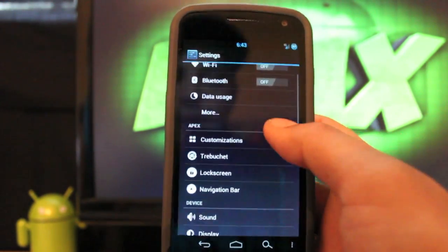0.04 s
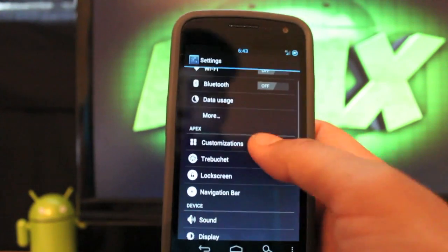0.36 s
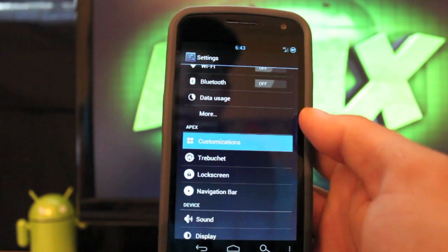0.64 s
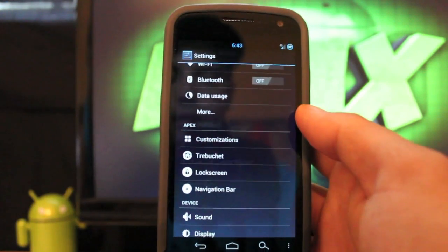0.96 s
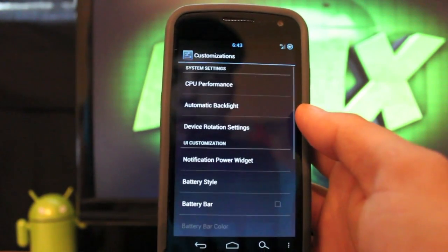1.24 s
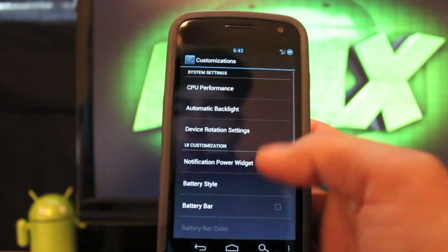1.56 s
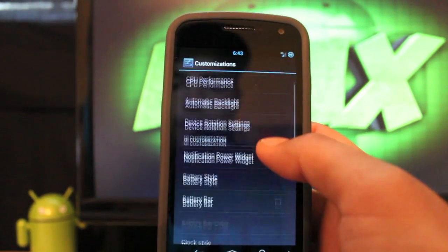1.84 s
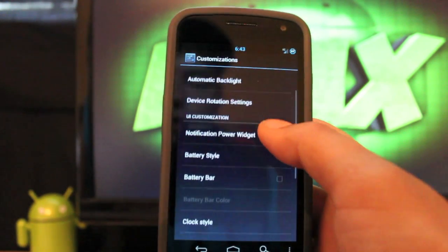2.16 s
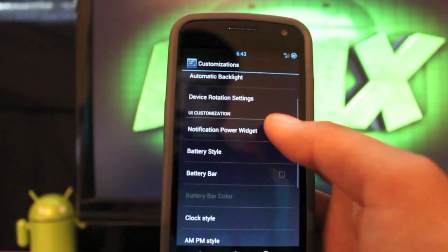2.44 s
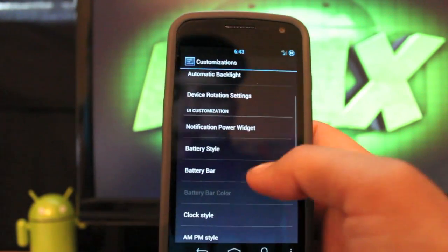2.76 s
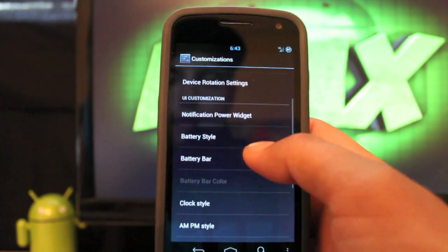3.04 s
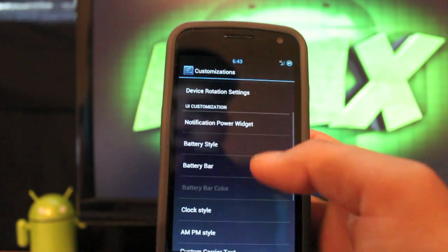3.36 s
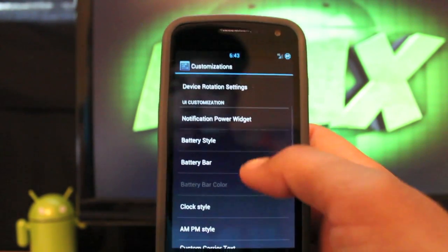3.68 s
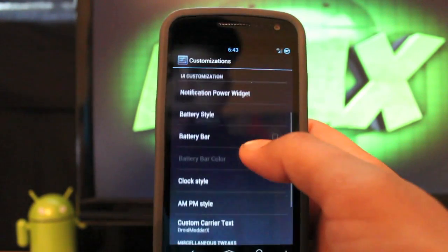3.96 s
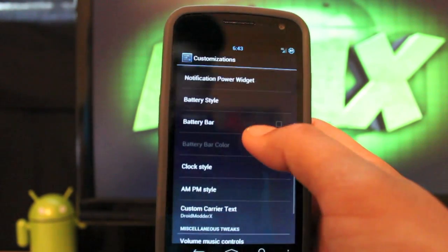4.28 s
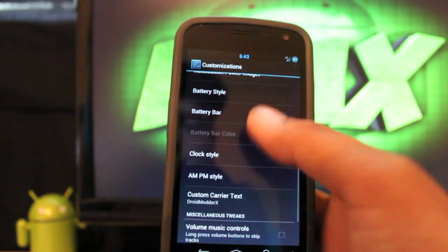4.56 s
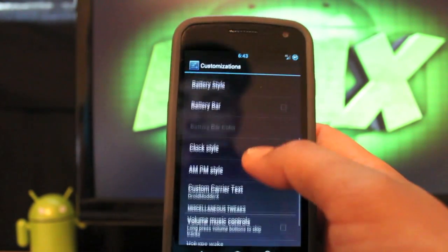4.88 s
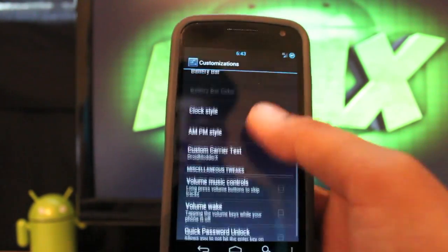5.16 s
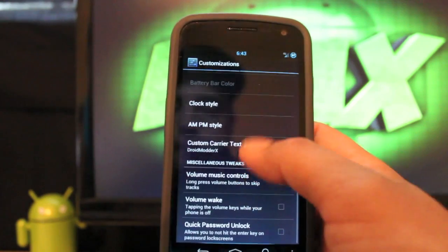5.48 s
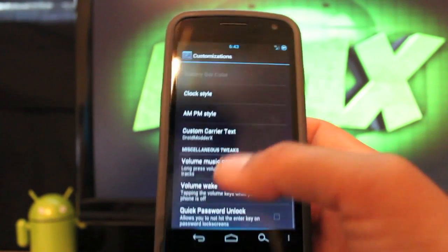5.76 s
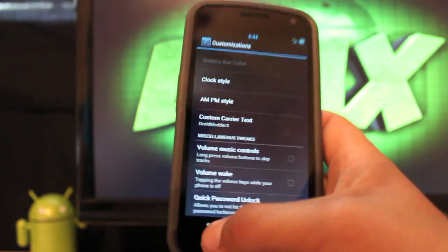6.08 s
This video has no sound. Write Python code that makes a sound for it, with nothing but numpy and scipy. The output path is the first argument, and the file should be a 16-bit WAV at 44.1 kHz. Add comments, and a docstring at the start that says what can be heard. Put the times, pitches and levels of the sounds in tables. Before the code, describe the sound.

A faint fan hum and hollow hiss, then dull thumps, low rumble and a few plastic ticks as a phone is handled close up.

```python
"""A quiet room: a faint fan hum and a hollow microphone hiss run throughout.
At about 1.3 s a phone, held and thumbed close to the camera, gives a first faint, deep bump.
From 4.3 s the handling sends runs of dull, soft-edged thumps and rumble into the microphone,
and near 4.8 s the plastic case ticks a few times. The recorder's limiter ducks after the hardest
thump, at 5.65 s, and one last thin tick comes just before the end."""
import sys
import numpy as np
from scipy import signal
from scipy.fft import rfft, irfft
from scipy.io import wavfile
from scipy.ndimage import uniform_filter1d, minimum_filter1d

SR = 44100
rng = np.random.default_rng(int(sys.argv[2]) if len(sys.argv) > 2 else 0)


def file_out(sig):
    """Save sig as 16-bit WAV at sys.argv[1]."""
    # one column per channel
    cols = np.atleast_2d(sig).T
    # limit, then scale
    lim = np.clip(cols, -1, 1)
    pcm = np.round(lim * 32767).astype(np.int16)
    wavfile.write(sys.argv[1], SR, pcm)


N = 269892
TIME = np.arange(N) / SR
FREQS = np.fft.rfftfreq(N, 1 / SR)

# Steady tones of the fan and electronics. Each row: pitch in Hz, rms level in dB.
FAN_TONES = [(236.0, -62.5), (323, -70), (629.7, -68.5), (1980, -72)]
# Resonances excited by the fan's air noise. Each row: centre in Hz, rms level in dB, width in Hz.
FAN_WHIRR = [(233, -72, 24), (455.6, -67, 21), (484.7, -66.5, 10.6), (520.7, -68.5, 8), (594, -65, 70),
             (679, -68, 16)]
# Air noise of the room. Each row: frequency in Hz, density in dB per Hz.
ROOM_AIR = [(5, -100), (16, -82), (35, -90), (65, -84.5), (400, -86.5), (750, -88.5), (1100, -93),
            (1450, -92), (1800, -99), (2400, -99), (4000, -110), (16000, -125)]
# Hiss shared by both channels, before its ripple. Each row: frequency in Hz, density in dB per Hz.
CENTRE_HISS = [(100, -100), (1000, -89.5), (2000, -93.5), (2950, -93), (4850, -96), (6850, -99),
               (11000, -103), (16000, -106.5)]
# Each channel's own noise floor. Each row: frequency in Hz, density in dB per Hz.
CHANNEL_FLOOR = [(20, -94.5), (400, -95), (1300, -96.5), (3000, -96), (4200, -95.5), (9000, -95.5),
                 (16000, -96)]
# Hand movements that shake the microphone. Each row: start and length in seconds, relative level in dB.
HAND_MOVES = [(1.272, 0.16, -37), (4.269, 0.22, -14), (4.729, 0.11, -14.5), (5.135, 0.16, -26),
              (5.337, 0.086, -22), (5.625, 0.08, -13.5), (5.795, 0.013, -29)]
# EQ curve of the rumble. Each row: frequency in Hz, relative gain in dB.
RUMBLE_EQ = [(5, -28), (20, 6.5), (42, -1), (80, -3), (130, -7.5), (220, -16), (350, -32), (520, -34),
             (800, -44), (2000, -110)]
# Thumps that stand out of the rumble. Each row: time of the peak in seconds, level in dB, centre in Hz,
# judder (2 is a single lump, 10 a few quick shakes).
HAND_THUMPS = [(1.402, -36, 25.9, 4.5), (4.273, -18, 45, 3.8), (4.328, -12, 72, 3.5), (4.381, -8, 77, 15),
               (4.44, -15, 222, 4.3), (4.455, -12, 130, 2.6), (4.51, -25.5, 209, 12),
               (4.732, -17.5, 58.4, 12), (4.790, -9.5, 122, 4.2), (4.811, -8, 193, 5.9),
               (4.858, -11, 77, 4.6), (4.904, -23.5, 56.5, 18), (5.142, -21, 39.8, 2.4),
               (5.409, -17, 45, 3.4), (5.65, -2, 74.7, 6.8), (5.687, -7.5, 65, 5.1),
               (5.732, -11.5, 101, 11.4)]
# Ticks of the case. Each row: start in seconds, peak level in dB, low and high band edges in Hz,
# scrape decay in seconds.
CASE_TICKS = [(4.82, -34, 1100, 4000, 0.00054), (4.8376, -32, 4000, 6600, 0.00024),
              (4.8445, -29.5, 4030, 6200, 0.00036), (4.875, -25.5, 1250, 4720, 0.0014),
              (6.0990, -40, 12000, 14700, .002)]
# Modes of the plastic case. Each row: pitch in Hz, relative level in dB, seconds to die away by 60 dB.
CASE_MODES = [(1470, -4, 0.022), (1720, 0, 0.0049), (3410, -1, 0.01), (4090, 2, 0.0031),
              (5300, 2.5, 0.0022), (7000, 7, 0.0027), (13700, -12, .006)]


def amp(db):
    """Decibels to gain."""
    return 10 ** (np.asarray(db) / 20)


def unit_rms(x):
    """Scales to rms 1."""
    return x / np.sqrt(np.mean(x ** 2) + 1e-30)


def eq_curve(points):
    """Gain at every frequency, joining (Hz, dB) points on a log axis."""
    hz, db = np.transpose(points)
    return amp(np.interp(np.log(FREQS + 1), np.log(hz + 1), db))


def noise(gain):
    """Noise whose density per root Hz is the given gain."""
    return irfft(rfft(rng.standard_normal(N)) * gain, N) * np.sqrt(SR / 2)


def fan_hum(waver_hz=1.21):
    """Slightly wavering tones of a small fan and electronics, over narrow bands of whirr."""
    out = np.zeros(N)
    for hz, db, width in FAN_WHIRR:
        resonance = 1 / (1 + (2 * (FREQS - hz) / width) ** 2)
        out += amp(db) * unit_rms(noise(resonance))
    for hz, db in FAN_TONES:
        drift = waver_hz * unit_rms(noise(1 / (1 + (FREQS / 2) ** 2)))
        out += amp(db) * np.sqrt(2) * np.sin(2 * np.pi * np.cumsum(hz + drift) / SR)
    return out


def room_tone():
    """The air of the room lays a soft, dark bed of noise."""
    return noise(eq_curve(ROOM_AIR))


def hollow_hiss(delay_s=0.0005094, feedback=0.43):
    """Hollow hiss: inverted repeats every half millisecond leave humps 2 kHz apart."""
    comb = abs(1 + feedback * np.exp(-2j * np.pi * FREQS * delay_s))
    return noise(eq_curve(CENTRE_HISS) / comb)


def self_noise():
    """One channel's own even, nearly white hiss."""
    return noise(eq_curve(CHANNEL_FLOOR))


def hand_shake(attack_db_per_s=850, press_db=4, settle_db_per_s=161):
    """Envelope of the shaking: each movement sets in quickly, presses harder, then settles."""
    envelope = np.zeros(N)
    for start, length, db in HAND_MOVES:
        t = TIME - start
        attack = attack_db_per_s * np.minimum(t, 0)
        press = press_db * (np.clip(t / length, 0, 1) - 1)
        settle = -settle_db_per_s * np.maximum(t - length, 0)
        envelope += amp(np.maximum(db + attack + press + settle, -200))
    return envelope


def handling_rumble(gain_db=-7, gentle_hz=65, firm_db=-18):
    """Irregular low shudder of the shaken microphone: gentle movement gives only its deepest part."""
    shake = hand_shake()
    full = unit_rms(noise(eq_curve(RUMBLE_EQ)))
    deep = irfft(rfft(full) / (1 + (FREQS / gentle_hz) ** 2), N)
    firmness = np.clip(shake / amp(firm_db), 0, 1) ** 2
    return amp(gain_db) * shake * (firmness * full + (1 - firmness) * deep)


def lump(t, hz, judder):
    """A smooth lump of pressure with a trough on either side; a juddering one shakes a few times."""
    return ((1 - 2j * np.pi * hz * t / judder) ** -(judder + 1)).real


def handling_thumps(cutoff_hz=580, knock_db=-15, knock_delay_s=0.00527):
    """Dull bumps of the hand reach the microphone through the housing; hard ones bottom out in a knock."""
    out = np.zeros(N)
    for peak_s, db, hz, judder in HAND_THUMPS:
        near = abs(TIME - peak_s) < 0.2
        t = TIME[near] - peak_s
        body = amp(db) * lump(t, hz, judder)
        # the knock grows with the square of the thump's strength
        knock = amp(knock_db + 2 * db) * lump(t - knock_delay_s, hz=264, judder=9.2)
        out[near] += body + knock
    muffle = 1 / np.sqrt(1 + (FREQS / cutoff_hz) ** 12)
    return irfft(rfft(out) * muffle, N)


def hiss_dip(handling, depth_db=-7, knee_db=-41):
    """Gain that sinks the hollow hiss while the microphone is shaken."""
    power = abs(uniform_filter1d(handling ** 2, size=1500))
    return amp(depth_db * power / (power + amp(knee_db) ** 2))


def case_ticks(scrape=0.24):
    """A snap and a tiny scrape ring the case; each contact reaches its own range of the modes."""
    out, t = np.zeros(N), np.arange(2048) / SR
    ring = sum(amp(db - 60 * t / t60) * np.cos(2 * np.pi * hz * t) for hz, db, t60 in CASE_MODES)
    for start, db, low_hz, high_hz, decay in CASE_TICKS:
        contact = scrape * rng.standard_normal(len(t)) * np.exp(-t / decay)
        contact[0] += 1  # the snap
        band = signal.butter(2, [low_hz, high_hz], "bandpass", fs=SR, output="sos")
        tick = signal.sosfilt(band, signal.fftconvolve(contact, ring)[:len(t)])
        slot = out[round(start * SR):][:len(t)]
        slot += amp(db) * tick[:len(slot)] / abs(tick).max()
    return out


def limiter(mix, threshold_db=-7, slope=0.54, hold_s=0.059, recover_db_per_s=95, lag_s=0.022):
    """The recorder's gain ducks just after a hard peak, holds, then recovers."""
    peak_db = 20 * np.log10(abs(mix).max(0) + 1e-9)
    half_hold = round(hold_s * SR / 2)
    held_db = -minimum_filter1d(-peak_db, 2 * half_hold + 1, origin=half_hold)
    release_ramp = TIME * recover_db_per_s
    envelope_db = np.maximum.accumulate(held_db + release_ramp) - release_ramp
    over_db = np.maximum(envelope_db - threshold_db, 0)
    pole = np.exp(-1 / (lag_s * SR))
    duck_db = slope * signal.lfilter([1 - pole], [1, -pole], over_db)
    return mix / amp(duck_db)


def scene(spread_db=-27):
    """Nearly everything sits dead centre; each channel adds its own trace of rumble and its own noise."""
    handling = handling_thumps() + handling_rumble()
    centre = handling + case_ticks() + fan_hum() + room_tone() + hollow_hiss() * hiss_dip(handling)
    sides = [amp(spread_db) * handling_rumble() + self_noise() for channel in range(2)]
    return centre + np.array(sides)


def record(dry, cutoff_hz=15750):
    """The recorder limits the mix, then cuts off the very top of the treble."""
    high_cut = signal.firwin(1023, cutoff_hz, window=("kaiser", 9), fs=SR)
    return signal.oaconvolve(limiter(dry), high_cut[None], "same")


dry = scene()
out = record(dry)
file_out(out)
```